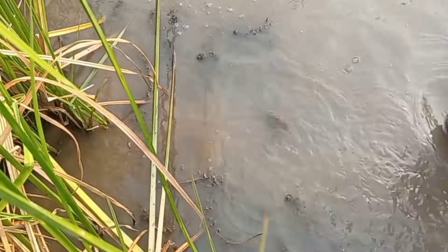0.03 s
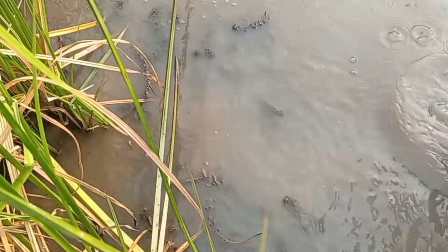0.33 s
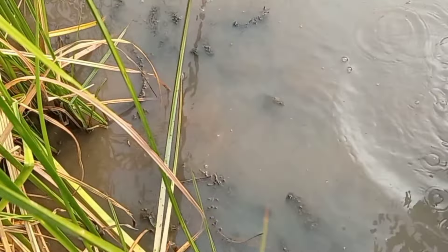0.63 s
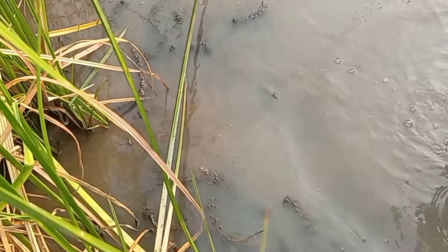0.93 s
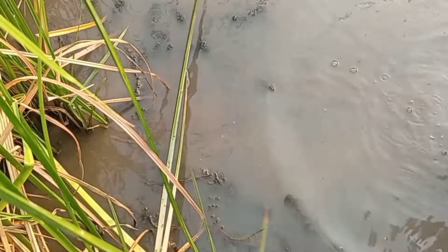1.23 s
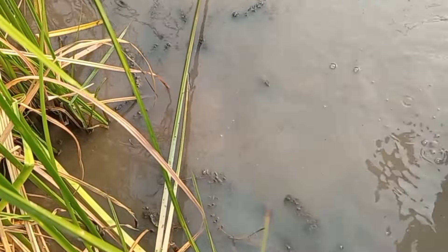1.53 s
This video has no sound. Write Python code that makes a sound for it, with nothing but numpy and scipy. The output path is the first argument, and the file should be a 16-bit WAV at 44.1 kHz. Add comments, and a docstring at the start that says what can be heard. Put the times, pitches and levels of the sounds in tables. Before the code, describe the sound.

A small bird twitters briefly in the reeds over faint, high insect buzzing and a low distant rumble. Close to the microphone, a hand net dips into a shallow muddy pond with a small plop. Scattered drips, dribbles and light bubbling follow as it is worked through the water, building near the end to a long, louder sloshing scoop with gurgles, spray and a few deep gulps.

```python
"""A small bird twitters and insects buzz in the reeds over a low distant rumble. A hand net is then
worked through a shallow muddy pond: a few plops and dribbles, then a long sloshing scoop.
The water sounds through ringing air bubbles, drop impacts and spray; deep gulps follow the net.
The bird whistles in quick upward sweeps; the insects chirp with rapid wing strokes."""
import sys
import numpy as np
from scipy import signal
from scipy.fft import rfft, irfft, next_fast_len
from scipy.io import wavfile
from scipy.ndimage import map_coordinates

SR = 44100
rng = np.random.default_rng(int(sys.argv[2]) if len(sys.argv) > 2 else 0)


def put_to_file(sound):
    """Save the sound as 16-bit audio at rate SR, in the file named by the first command-line argument."""
    columns = np.atleast_2d(sound).T  # one column per channel
    safe = np.clip(columns, -1, 1)
    whole_steps = np.round(safe * 32767)
    wavfile.write(sys.argv[1], SR, whole_steps.astype(np.int16))


N = 307377

# Sudden splashes. Each row: start in seconds, gurgle, spray and slap levels in dB, decay in seconds.
SPLASH_EVENTS = [(1.2526, -51, -56, -47.5, 0.0085), (1.284, -48.5, -64, -41.5, 0.0076),
                 (1.481, -66, -75, -59.5, 0.034), (1.579, -76, -66.5, -51.5, 0.015),
                 (2.457, -62.5, -52.5, -80, 0.028), (5.021, -69, -66, -34.5, 0.0063),
                 (5.408, -47, -48, -60, 0.011), (5.761, -42, -53, -55, 0.0064),
                 (5.802, -47, -42, -54, 0.027), (5.871, -40.5, -42.5, -58, 0.022),
                 (5.926, -38.5, -52, -50.5, 0.049), (6.255, -41, -39.5, -54.5, 0.035),
                 (6.345, -43, -47.5, -52.5, 0.047), (6.527, -48.5, -50, -62, 0.023),
                 (6.655, -47.5, -50.5, -78, 0.046), (6.737, -52, -51.5, -70, 0.017),
                 (6.781, -60, -55, -38, 0.027), (6.835, -61, -52, -66, 0.014)]
# Fine bubbles. Each row: pitch in Hz, relative strength in dB.
FINE_BUBBLE_COLOUR = [(1900, -7.5), (2400, -1.5), (3300, -2), (4600, -4), (6200, 4), (7400, -19.5)]
GURGLE, SPRAY = 0, 1


def slosh(gurgle_db=-1.5, spray_db=-2, mist_db=-9):
    """Stirring and splashing drive low gurgling bubbles, clumps of bright spray and a torn-water hiss."""
    # Each row: bubble pitch in Hz, relative strength in dB.
    gurgle_colour = [(380, -14.5), (540, -5.5), (800, 5.5), (1150, 2.5), (1550, 8), (2000, -5)]
    t = np.arange(SR // 3) / SR
    clumps = unit_rms(gain_of(3 * drift(90)))
    gurgle_power = stroke_power(GURGLE) * gain_of(gurgle_db) ** 2
    spray_power = stroke_power(SPRAY) * (gain_of(spray_db) * clumps) ** 2
    for start_s, low_db, high_db, _, decay_s in SPLASH_EVENTS:
        decay = np.exp(-t / decay_s)
        add(gurgle_power, start_s, (gain_of(low_db) * decay) ** 2)
        add(spray_power, start_s, (gain_of(high_db) * decay) ** 2)
    gurgle = swarm(gurgle_power, 397.4, 1987, gurgle_colour,
                   per_s=520, crowding=0.22, cycles=19.5, spread_db=20)
    spray = swarm(spray_power, 1908, 7050, FINE_BUBBLE_COLOUR,
                  per_s=1500, crowding=0.32, cycles=24, spread_db=21.5)
    mist = noise([(200, -37), (500, -14), (1200, 2.5), (2000, -14), (6800, 11), (8000, -11.5),
                  (12500, -22), (16000, -6)])
    gurgle *= unit_rms(gain_of(3 * drift(450)))
    mist *= np.sqrt(spray_power) * gain_of(mist_db + 2 * drift(150))
    return gurgle + spray + mist


def stroke_power(layer, rise_db=27.5, fall_db=27, curve=1.464):
    """Power the net puts into GURGLE or SPRAY; each stroke swells and dies along an arch."""
    # Each row: fastest moment, wind-up and run-down in seconds, gurgle and spray levels in dB.
    net_strokes = [(2.6, 0.13, 0.48, -67.5, -69.5), (2.93, 0.34, 0.44, -62.5, -59.5),
                   (3.53, 0.13, 0.11, -73, -79), (4.36, .07, 0.14, -69, -68.5),
                   (4.579, 0.4, 0.36, -58.5, -61.5), (5.8, 0.62, 0.76, -46.5, -46.5),
                   (6.312, 0.29, 0.24, -47.5, -51.5), (6.62, 0.26, 0.72, -52, -60.5)]
    power = np.full(N, 1e-14)
    for peak_s, wind_up_s, run_down_s, *levels_db in net_strokes:
        t = np.arange(N) / SR - peak_s
        before = np.clip(-t / wind_up_s, 0, 1)
        after = np.clip(t / run_down_s, 0, 1)
        db = levels_db[layer] - rise_db * before ** curve - fall_db * after ** curve
        power += gain_of(db) ** 2 * (before + after < 1)
    return power


def plops(gain_db=1, flutter_db=2, fade_db=19, cycles=17, ring_on_s=0.0035):
    """Single large bubbles ring, shaken by the moving water; small ones die sooner."""
    # Each row: start in seconds, level in dB, first pitch in Hz, glide in octaves.
    single_bubbles = [ (.419, -54.5, 6100, -0.27), (.528, -54, 2110, -0.29), (1.2577, -35.5, 835, -0.13),
                      (1.26, -43, 5810, -0.13), (1.574, -59.5, 3220, 0.33), (1.599, -52.5, 3350, 0.69),
                      (1.611, -58, 3300, 0.67), (1.661, -56, 6230, -0.05), (2.387, -42.5, 3470, 0.31),
                      (2.408, -64.5, 1070, 0.42), (2.459, -47.5, 1455, 1), (2.49, -53, 1380, 1.55),
                      (2.525, -60, 817, -0.21), (2.612, -62, 1200, 0.21), (2.797, -51, 2140, -0.36),
                      (2.8, -58, 1270, -0.22), (2.855, -54.5, 2450, 0.1), (2.912, -53, 2500, .3),
                      (2.929, -56, 950, 0.95), (3.018, -59, 754, .3), (3.034, -44.5, 1834, 0.97),
                      (3.04, -53, 1160, -0.32), (3.072, -62, 780, 0.27), (3.108, -53.5, 890, 0.47),
                      (3.166, -40.5, 4100, 0.035), (3.298, -56.5, 2930, -0.54), (4.312, -41, 692, 1.36),
                      (4.443, -43.5, 1505, 1.3), (4.679, -49, 604, 0.85), (4.725, -52.5, 726, 0.46),
                      (5.0, -36, 2960, 0.45), (5.302, -48.5, 1280, -0.33), (5.549, -38, 1810, -0.31),
                      (5.718, -44.5, 1010, -.1), (5.731, -36.5, 576, -0.19), (5.762, -37.5, 1067, 0.34),
                      (5.764, -37.5, 2120, .3), (5.8, -36, 631, -0.097), (5.885, -35.5, 848, -0.27),
                      (5.905, -33.5, 6020, .03), (5.909, -40, 1610, 0.16), (5.923, -31, 770, -0.12),
                      (5.926, -34, 539, 0.3), (6.0124, -30.5, 1125, 0.21), (6.048, -39.5, 682, -0.018),
                      (6.15, -44, 464, -0.019), (6.184, -40, 904, 1.37), (6.199, -28.5, 2426, 0.34),
                      (6.25, -30, 4450, 0.12), (6.262, -36.5, 1656, -0.39), (6.271, -34, 1594, -0.18),
                      (6.28, -39, 694, -0.034), (6.297, -34, 1096, -0.22), (6.363, -36, 1067, 0.69),
                      (6.372, -33, 722, 0.4), (6.544, -32.5, 2130, 0.49), (6.571, -33.5, 2330, -0.16),
                      (6.586, -40.5, 1240, 0.55), (6.606, -39.5, 592, -0.2), (6.606, -37.5, 1033, -0.11),
                      (6.626, -33.5, 980, 1.6), (6.635, -33.5, 1910, 0.42), (6.68, -37, 4420, .02),
                      (6.691, -41, 1210, -0.28), (6.781, -44, 2106, 0.27), (6.833, -37, 1130, 0.69),
                      (6.846, -40.5, 2050, 0.093), (6.883, -45.5, 856, 1.6), (6.914, -46.5, 3210, -0.15),
                      (6.939, -46, 2030, -0.035),]
    out = np.zeros(N)
    for start_s, db, hz, octaves in single_bubbles:
        swell = 0.11 + 0.052 * max(octaves, 0)  # a surfacing bubble swells for longer
        life_s = cycles / hz + ring_on_s
        add(out, start_s, gain_of(db) * bubble(hz, hz * 2 ** octaves, life_s, swell, fade_db))
    lag_s = 5.5e-5 * drift(220)
    shaken = map_coordinates(out, [np.arange(N) + lag_s * SR], order=3)
    return shaken * gain_of(gain_db + flutter_db * drift(250))


def drops(gain_db=1, ring_s=0.0014, slap_s=0.0012, spatter_s=0.0065, skirt_db=-19):
    """Each drop slaps the surface, rings a tiny bubble and spatters; higher rings die sooner."""
    # Each row: start in seconds, level in dB, pitch in Hz.
    large_drops = [(0.276, -66, 5330), (.582, -66, 5700), (1.256, -44, 1150), (1.2606, -51, 5750),
                   (1.2857, -39, 910), (1.564, -59, 5850), (2.4569, -42.5, 2520), (2.457, -44.5, 1230),
                   (2.47, -44, 3180), (2.54, -54, 2860), (2.579, -51.5, 1920), (2.583, -54, 5600),
                   (2.7008, -54, 5560), (2.715, -50.5, 5960), (2.766, -46.5, 2530), (2.8872, -46, 6340),
                   (2.9874, -48, 2400), (3.024, -42, 2550), (3.112, -50.5, 4600), (3.1662, -49, 3570),
                   (3.2362, -52.5, 6800), (3.664, -70, 5850), (4.341, -50, 5530), (4.393, -50, 5600),
                   (4.4307, -40, 1980), (4.473, -50, 5170), (4.515, -42, 2780), (4.682, -51, 6000),
                   (4.9714, -44.5, 3030), (5.018, -41.5, 3260), (5.0202, -32, 1360), (5.0317, -44.5, 3250),
                   (5.0378, -39.5, 2800), (5.048, -42.5, 3120), (5.1422, -56, 5770), (5.33, -47.5, 5670),
                   (5.4214, -33.5, 2630), (5.5137, -39.5, 3940), (5.6716, -33, 3410), (5.8085, -41, 3390),
                   (5.871, -36, 1100), (5.9193, -33, 2480), (5.936, -26, 1060), (5.9442, -30, 960),
                   (5.9606, -26.5, 990), (6.0069, -36.5, 2450), (6.237, -36, 1410), (6.415, -37.5, 1890),
                   (6.4595, -38, 3120), (6.6114, -31.5, 1100), (6.769, -32, 1110)]
    out, t = np.zeros(N), np.arange(SR // 20) / SR
    impact_shape = 0.68 * np.exp(-t / slap_s) + 0.22 * np.exp(-t / spatter_s)
    attack = 1 - np.exp(-t / 0.000084)
    for start_s, db, hz in large_drops + drips():
        band = [(hz / 3, skirt_db), (hz / 1.96, 0), (hz * 1.36, 0), (hz * 4, skirt_db)]
        impact = coloured(rng.standard_normal(len(t)) * impact_shape, band)
        ring = attack * np.exp(-t / ring_s * np.sqrt(hz / 3000)) * np.sin(2 * np.pi * hz * t)
        add(out, start_s, gain_of(db + gain_db) * (impact + ring))
    return coloured(out, [(300, -5.5), (1200, 0.5), (6400, 8), (7400, -4.5), (10000, -12), (16000, -29)])


def drips(per_s=11, low_hz=2400, high_hz=6500, spread_db=6):
    """Rows for drops(): small drips leave the moving mesh at random, about as strong as its spray."""
    spray_db = 10 * np.log10(stroke_power(SPRAY))
    falls = rng.random(N) < per_s / SR
    hz = low_hz * (high_hz / low_hz) ** rng.random(N)
    db = spray_db + spread_db * rng.uniform(-1, 1, N)
    return [(k / SR, db[k], hz[k]) for k in np.flatnonzero(falls & (spray_db > -100))]


def gulps():
    """Large cavities collapse behind the net with a few falling low cycles."""
    # Each row: start in seconds, level in dB, first pitch in Hz, life in seconds.
    cavities = [(1.294, -48, 136, 0.057), (6.523, -26, 164, 0.025), (6.778, -24, 179, 0.025),
                (6.799, -28.5, 116, 0.046), (6.859, -31, 164, 0.037)]
    out = np.zeros(N)
    for start_s, db, hz, life_s in cavities:
        add(out, start_s, gain_of(db) * bubble(hz, hz * 0.35, life_s, swell=0.098))
        add(out, start_s, gain_of(db - 14) * bubble(hz * 2.016, hz * 0.98, life_s, swell=0.57))
    return out


def glugs(fade_db=7, waver=0.03, flutter_db=3.5):
    """Air held under the mesh keeps ringing while it fills; the pitch wavers and mostly climbs."""
    # Each row: start in seconds, level in dB, first and target pitch in Hz, glide time in seconds.
    air_pockets = [(2.643, -63, 900, 1220, 0.02), (2.75, -56, 415, 489, 0.056),
                   (2.813, -55, 490, 1088, 0.061), (2.81, -60, 993, 716, .045),
                   (2.909, -50, 750, 814, 0.017), (3.023, -60, 560, 700, 0.038),
                   (3.113, -50.5, 577, 670, 0.024), (6.2, -39.5, 728, 1286, 0.027),
                   (6.341, -30.5, 633, 1036, 0.022), (6.515, -37.5, 1136, 1015, 0.029),
                   (6.533, -44, 614, 725, 0.05), (6.564, -38, 793, 1015, 0.06),
                   (6.655, -35, 850, 1230, 0.019), (6.67, -40, 712, 1067, 0.072),
                   (6.743, -43, 607, 1004, 0.028), (6.763, -37.5, 1064, 1040, 0.021),
                   (6.837, -39, 572, 748, 0.039), (6.859, -38.5, 736, 652, 0.024)]
    out = np.zeros(N)
    bend = 1 + waver * drift(160)
    for start_s, db, first_hz, target_hz, glide_s in air_pockets:
        u = np.arange(int(1.3 * glide_s * SR)) / (glide_s * SR)
        hz = first_hz * (target_hz / first_hz) ** u * np.roll(bend, -round(start_s * SR))[:len(u)]
        shape = np.interp(u, [0, 0.25, 0.9, 1.3], [0, 1, 1, 0])
        add(out, start_s, gain_of(db - fade_db * u) * shape * sine(hz))
    return out * gain_of(flutter_db * drift(170))


def spatters(attack_s=0.00035):
    """Flung droplets land in short bursts, each ringing a cluster of tiny bubbles."""
    # Each row: start in seconds, level in dB, decay in seconds.
    bursts = [(4.338, -55.5, .014), (4.428, -53.5, 0.0063), (4.514, -52, .006), (5.42, -43.5, .005),
              (5.542, -40, 0.004), (5.579, -45, 0.0056), (5.752, -53, 0.0052), (5.811, -45, 0.011),
              (5.894, -44.5, 0.021), (6.016, -46, 0.011), (6.104, -45, 0.0076), (6.173, -44, 0.0099),
              (6.2135, -38.5, .006), (6.227, -36, 0.006), (6.262, -38, 0.01), (6.292, -37, 0.0098),
              (6.307, -42, 0.0036), (6.344, -36, 0.0068), (6.351, -47.5, 0.011), (6.385, -53, 0.0098),
              (6.522, -47.5, 0.015), (6.542, -44, 0.01), (6.658, -46, 0.012), (6.67, -46.5, .016),
              (6.696, -46.5, .012), (6.734, -56, 0.0063), (6.822, -53.5, 0.026), (6.848, -49, .008)]
    # Each row: bubble pitch in Hz, relative strength in dB.
    droplet_colour = [(3200, -9.5), (4400, -6.5), (5200, -2.5), (6500, 3), (7100, -5.5)]
    power, t = np.full(N, 1e-14), np.arange(SR // 8) / SR
    attack = 1 - np.exp(-t / attack_s)
    for start_s, db, decay_s in bursts:
        add(power, start_s, (gain_of(db) * attack * np.exp(-t / decay_s)) ** 2)
    return swarm(power, 3200, 7100, droplet_colour, per_s=970, crowding=0.35, cycles=24, spread_db=10.5)


def slaps(attack_s=0.000091):
    """The net shoves the water aside with a dull, toneless slap."""
    push, t = np.zeros(N), np.arange(SR // 3) / SR
    attack = 1 - np.exp(-t / attack_s)
    for start_s, _, _, db, decay_s in SPLASH_EVENTS:
        add(push, start_s, gain_of(db) * attack * np.exp(-t / decay_s))
    dull = noise([(60, -20), (200, 7.5), (450, -10), (700, -10), (1500, -19.5), (2500, -35), (5000, -51)])
    return push * dull


def crackle(gain_db=-5):
    """Water films tear on the mesh in dense, fine pops too short to have a pitch."""
    # Each row: frequency in Hz, relative strength in dB.
    pop_colour = [(900, -1), (1500, 1.5), (2600, 2.5), (4400, -4.5), (6200, -1.5), (7000, -11)]
    power = stroke_power(SPRAY) * gain_of(gain_db) ** 2
    return swarm(power, 937, 6800, pop_colour, per_s=3000, crowding=0.14, cycles=6.5, spread_db=10)


def swishes():
    """Water sieved through the mesh breaks into a cloud of tiny bubbles of much the same size."""
    # Each row: loudest moment in seconds, level in dB, rise and decay in seconds.
    surges = [(4.53, -59.5, 0.052, 0.06), (4.646, -52.5, 0.038, 0.029), (5.001, -43, 0.0083, 0.0085),
              (5.036, -49, 0.0082, 0.012), (5.066, -59.5, 0.017, 0.057), (5.675, -57, 0.016, 0.022)]
    # Each row: bubble pitch in Hz, relative strength in dB.
    mesh_colour = [(1500, 5.5), (2300, -4), (3100, 12), (3800, 0.5), (4800, -23)]
    power, t = np.full(N, 1e-14), np.arange(N) / SR
    for peak_s, db, rise_s, decay_s in surges:
        shape = np.exp(np.minimum((t - peak_s) / rise_s, (peak_s - t) / decay_s))
        power += (gain_of(db) * shape) ** 2
    return swarm(power, 1510, 4920, mesh_colour, per_s=2700, crowding=0.33, cycles=7.5, spread_db=12.5)


def slosh_ring(peak_s=6.05, peak_db=-51.5, slope_db_per_s=62.5, impulses_per_s=400):
    """A faint ringing at a few fixed pitches (2-4 kHz) swells and fades with the big slosh."""
    # Each row: pitch in Hz, width in Hz (capped at 70 below), level in dB.
    ring_pitches = [(2360, 31, -8), (3210, 37, 4.5), (3450, 30, -9), (3420, 35, -4), (4060, 48, 7),
                    (4030, 72, -10)]
    impulses = rng.standard_normal(N) * (rng.random(N) < impulses_per_s / SR)
    t = np.arange(SR // 10) / SR
    ring = sum(gain_of(db) * np.exp(-np.pi * min(width_hz, 70) * t) * np.sin(2 * np.pi * hz * t)
               for hz, width_hz, db in ring_pitches)
    level_db = peak_db - slope_db_per_s * abs(np.arange(N) / SR - peak_s)
    return unit_rms(signal.oaconvolve(impulses, ring)[:N]) * gain_of(level_db)


def swarm(power, low_hz, high_hz, colour, per_s, crowding, cycles, spread_db):
    """Random small bubbles, per_s a second at a power of -50 dB; crowding ties their rate to the power."""
    rate = per_s * (power / gain_of(-50) ** 2) ** crowding
    starts = np.flatnonzero(rng.random(N) < rate / SR)
    loudness, pitch, life, glide = rng.random((N, 4))[starts].T
    hz = low_hz * (high_hz / low_hz) ** pitch
    last_hz = hz * (0.92 + 0.22 * glide ** 2)
    life_s = cycles * 4 ** (life - 0.5) / hz
    strength = unit_rms(gain_of(spread_db * loudness ** 2 + np.interp(hz, *np.transpose(colour))))
    strength *= np.sqrt(power[starts] * SR / rate[starts])
    out = np.zeros(N)
    for k, start in enumerate(starts):
        ring = bubble(hz[k], last_hz[k], life_s[k], swell=0.08)
        add(out, start / SR, strength[k] * ring / np.linalg.norm(ring))
    return out


def bubble(first_hz, last_hz, life_s, swell, fade_db=20):
    """A trapped air pocket rings; its pitch glides ever faster as it nears the surface."""
    age = np.arange(int(2 * life_s * SR) + 2) / (life_s * SR)  # in lives; the second is a tail
    hz = first_hz * (last_hz / first_hz) ** np.minimum(age, 1) ** 1.53
    rise = np.sin(np.pi / 2 * np.minimum(age / swell, 1)) ** 2
    fall = gain_of(-fade_db * np.maximum(age - swell, 0) / (1 - swell))
    return rise * fall * np.minimum(2 - age, 1) * sine(hz)


def bird(gain_db=-1, rasp_per_s=900, flick_s=0.0125, upsweep_curve=1.7):
    """A thin, rough whistle sweeps ever faster upward, then hooks sharply down in each syllable."""
    # Each row: start in seconds, level in dB, length in seconds, first pitch, top pitch and rasp in Hz.
    syllables = [(0.018, -59.5, .027, 2810, 4080, 200), (0.045, -57, 0.019, 2650, 3390, 200),
                 (0.062, -67, 0.019, 2720, 3490, 200), (.249, -50.5, 0.047, 2890, 3800, 70),
                 (0.293, -54.5, 0.039, 2650, 4200, 70), (0.336, -54.5, 0.047, 3230, 4000, 109),
                 (.438, -59.5, 0.049, 2550, 3840, 70), (0.485, -57.5, 0.035, 2660, 3640, 70),
                 (0.522, -56.5, 0.042, 2570, 3900, 70), (0.768, -64, 0.024, 2760, 3510, 221),
                 (0.791, -65.5, .02, 2660, 3290, 220), (.6, -72, 0.036, 4400, 4700, 60),
                 (1.978, -69, 0.028, 3800, 3960, 50), (2.118, -76, 0.097, 3500, 4180, 80),
                 (3.75, -80, 0.11, 3450, 3630, 25), (3.996, -77.5, 0.087, 2670, 3340, 50)]
    out, quiver = np.zeros(N), drift(rasp_per_s)
    for start_s, db, length_s, first_hz, top_hz, rasp_hz in syllables:
        u = np.linspace(0, 1, int(length_s * SR))
        turn = np.clip(1 - flick_s / length_s, 0.25, 0.8)
        upsweep = (u / turn) ** upsweep_curve
        flick = np.interp(u, [turn, 0.75 * turn + 0.25, 1], [1, 0.9, -0.35])
        hz = first_hz + (top_hz - first_hz) * np.minimum(upsweep, flick)
        hz += rasp_hz * quiver[round(start_s * SR):][:len(u)]
        shape = np.interp(u, [0, 0.3 * turn, turn, 1], [0, 0.55, 1, 0.1])
        add(out, start_s, gain_of(db + gain_db) * shape * sine(hz))
    return out * gain_of(2 * drift(152.7))


def near_insect(level_db=-72, strokes_per_s=133.5, top_hz=7600, sweep_hz=1050, rasp=0.38):
    """Uneven chirps of about five wing strokes, each falling in pitch; returns the sound and its gate."""
    # Each row: time in seconds, chirps per second.
    chirp_pace = [(0, 13.5), (.8, 13.5), (1, 12.54), (2.5, 12.54), (2.95, 13.1), (7, 13.16)]
    t = np.arange(N) / SR
    chirp_count = np.cumsum(np.interp(t, *np.transpose(chirp_pace))) / SR + 0.082 + 0.03 * drift(20)
    gate = np.clip(2 * np.cos(2 * np.pi * chirp_count) + 0.3 * drift(13), 0.05, 1)
    chirp_offset = 0.3 * np.sin(2.4 * np.floor(chirp_count + 0.5))
    stroke_phase = (strokes_per_s * t + 0.012 * drift(40) + chirp_offset) % 1
    tone = np.sin(2 * np.pi * (top_hz - sweep_hz * stroke_phase / 2) * stroke_phase / strokes_per_s)
    scrape = noise([(6100, -31), (6700, -12), (7200, 5.5), (7700, -7), (8500, -23)])
    chirps = unit_rms(gate * np.sin(np.pi * stroke_phase) ** 2 * (tone + rasp * scrape))
    return chirps * gain_of(level_db + 1.6 * drift(11) + drift(110)), gate


def insect_chorus(gate, wing_hz=7340, width_hz=37, ring_db=-4, ring_floor=0.28):
    """Far insects merge into a hiss; wings add a thin ring that pulses with the chirp gate."""
    # Each row: frequency in Hz, relative level in dB.
    hiss_spectrum = [(5500, -46), (6300, -10.5), (6900, -2.5), (7250, -2), (7550, 6), (7850, -5.5),
                     (8300, -15.5), (9200, -13), (9800, -25)]
    # Each row: time in seconds, level in dB.
    chorus_levels = [(0, -76.5), (2.3, -75.5), (2.9, -72.5), (3.5, -74), (4.1, -74), (7, -68.5)]
    t = np.arange(N) / SR
    phase = 2 * np.pi * wing_hz * t
    narrow_band = drift(width_hz) * np.sin(phase) + drift(width_hz) * np.cos(phase)
    ring = gain_of(ring_db) * unit_rms(narrow_band * (ring_floor + gate))
    hiss = noise(hiss_spectrum) * gain_of(2 * drift(130))
    return (hiss + ring) * gain_of(np.interp(t, *np.transpose(chorus_levels)))


def rumble(start_db=-58.5, growth_db_per_s=0.65, swell_db=2.5, flutter_db=3):
    """A low distant rumble slowly grows; its three bands flutter independently."""
    # Each row: frequency in Hz, relative level in dB.
    rumble_spectrum = [(20, -24), (40, -29.5), (60, -12), (90, -1), (135, 1.5), (200, -7), (300, -18.5),
                       (450, -29), (700, -37.5), (1500, -47.5), (3000, -73)]
    level_db = start_db + growth_db_per_s * np.arange(N) / SR + swell_db * drift(6.4)
    steady = noise(rumble_spectrum)
    low = coloured(steady, [(95, 0), (135, -40)])
    high = coloured(steady, [(150, -40), (200, 0)])
    bands = [(low, flutter_db), (steady - low - high, flutter_db), (high, flutter_db / 2)]
    fluttering = sum(band * gain_of(depth_db * drift(24)) for band, depth_db in bands)
    return unit_rms(fluttering) * gain_of(level_db)


def air(level_db=-81):
    """Faint, even air noise."""
    # Each row: frequency in Hz, relative level in dB.
    air_spectrum = [(300, -7), (1500, 4), (3000, 2), (6000, 2), (8000, 7), (10000, -5), (16000, 2)]
    return gain_of(level_db) * noise(air_spectrum)


def seep(level_db=-89):
    """Stirred mud lets out faint, soft bubbles all the time."""
    power = np.full(N, gain_of(level_db) ** 2)
    return swarm(power, 2000, 6200, FINE_BUBBLE_COLOUR, per_s=150, crowding=0, cycles=70, spread_db=9)


def bank_echo(x, wet_db, t60_s):
    """Reeds and the bank add a short, thin scattered echo."""
    t = np.arange(SR // 2) / SR
    taps = rng.standard_normal(len(t)) * (rng.random(len(t)) < 0.05) * (t > 0.003)
    taps *= gain_of(-60 * t / t60_s)
    return x + gain_of(wet_db) * signal.oaconvolve(x, taps / np.linalg.norm(taps))[:N]


def gain_of(db):
    """Decibels to amplitude."""
    return 10 ** (np.asarray(db) / 20)


def unit_rms(x):
    """Scales to an rms of one."""
    return x / np.sqrt(np.mean(x ** 2) + 1e-20)


def sine(hz):
    """A sine that follows a pitch curve."""
    return np.sin(2 * np.pi * np.cumsum(hz) / SR)


def add(mix, start_s, sound):
    """Mixes a sound in at a time."""
    part = mix[max(round(start_s * SR), 0):][:len(sound)]
    part += sound[:len(part)]


def coloured(x, points):
    """Filters by a spectrum of (Hz, dB) points."""
    hz, db = np.transpose(points)
    size = next_fast_len(len(x) + SR // 10)
    bins_hz = np.fft.rfftfreq(size, 1 / SR)
    response = gain_of(np.interp(np.log(bins_hz + 1), np.log(hz + 1), db))
    return irfft(rfft(x, size) * response, size)[:len(x)]


def noise(points):
    """Noise with a spectrum of (Hz, dB) points, rms one."""
    return unit_rms(coloured(rng.standard_normal(N), points))


def drift(per_s):
    """A smooth random curve through per_s knots a second, rms one."""
    knots = rng.standard_normal(N // 100)
    return unit_rms(map_coordinates(knots, [np.arange(N) / SR * per_s], order=3, mode="wrap"))


def scene():
    """Water close by, the bird and seeping mud farther off, insects and rumble behind; mono."""
    water = plops() + glugs() + drops() + slosh() + crackle() + spatters() + swishes() + slaps()
    near = bank_echo(water + slosh_ring(), wet_db=-12, t60_s=0.094) + gulps()
    far = bank_echo(bird() + seep(), wet_db=-5.5, t60_s=0.13)
    chirps, gate = near_insect()
    return (near + far + chirps + insect_chorus(gate) + rumble() + air())[None]


def record(dry):
    """A microphone with a dull top octave, then a steep low-pass."""
    # Each row: frequency in Hz, gain in dB.
    mic_response = [(20, -4), (7200, -1), (7700, -2.5), (8200, -9.5), (9500, -10.5), (12500, -12.5),
                    (15000, -13.5)]
    cutoff_hz = 15650
    low_pass = signal.firwin(511, cutoff_hz, window=("kaiser", 9), fs=SR)
    return signal.oaconvolve(coloured(dry[0], mic_response), low_pass, "same")[None]


dry = scene()
out = record(dry)
put_to_file(out)
```